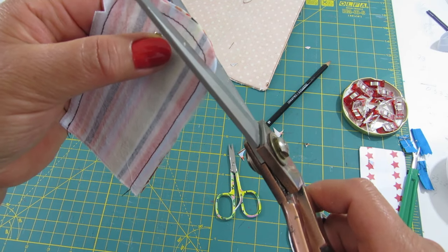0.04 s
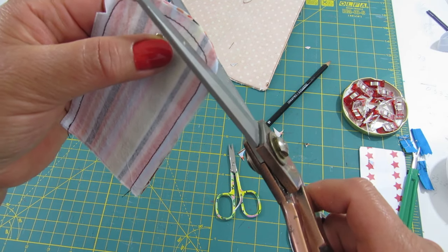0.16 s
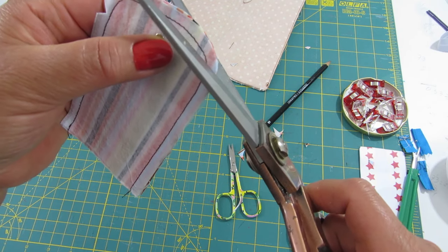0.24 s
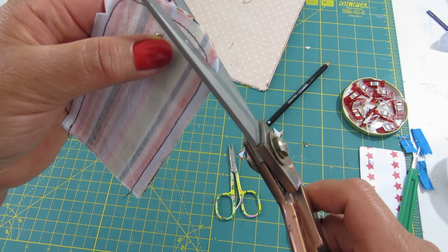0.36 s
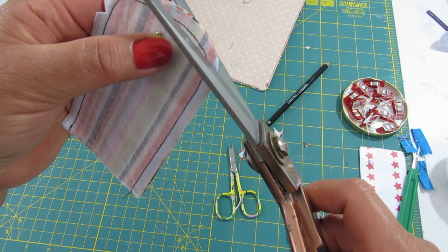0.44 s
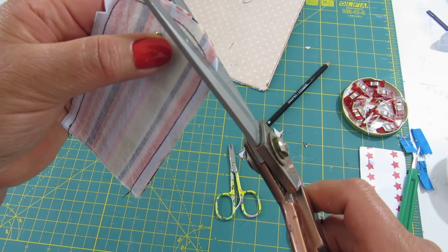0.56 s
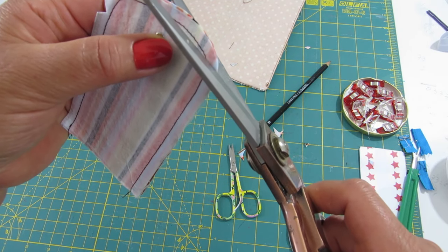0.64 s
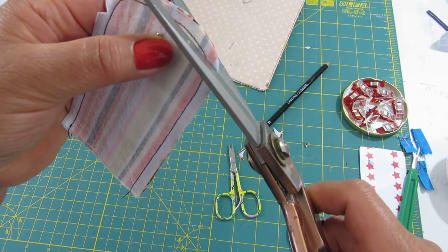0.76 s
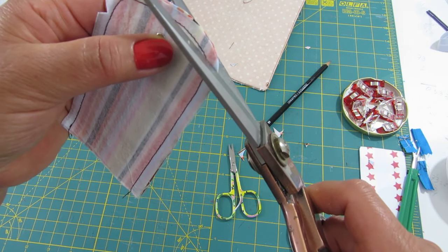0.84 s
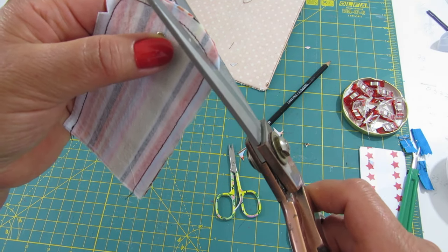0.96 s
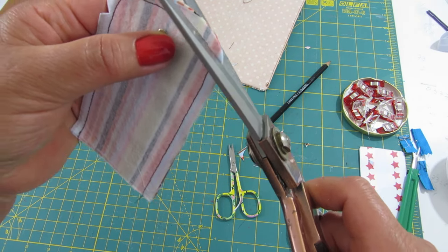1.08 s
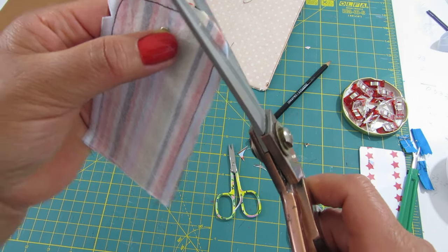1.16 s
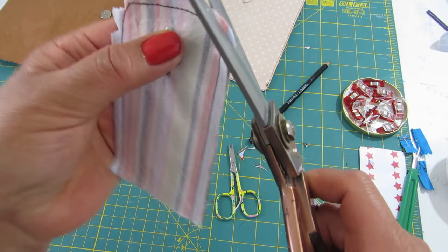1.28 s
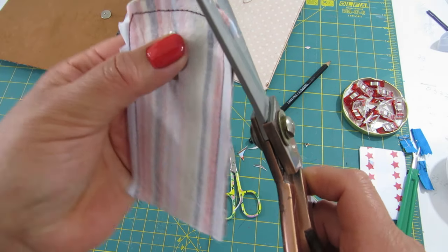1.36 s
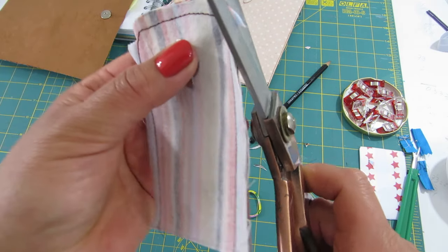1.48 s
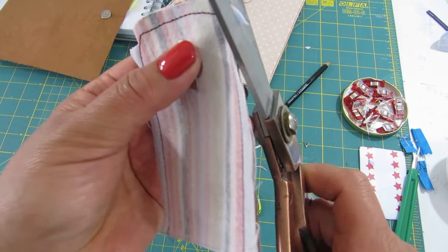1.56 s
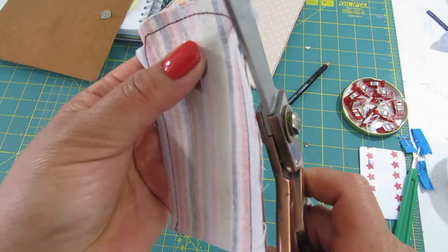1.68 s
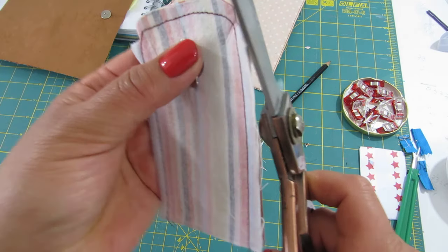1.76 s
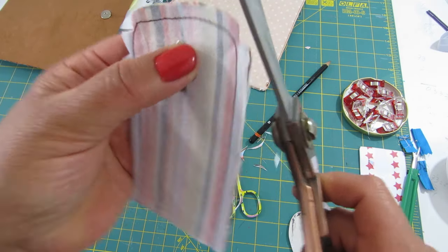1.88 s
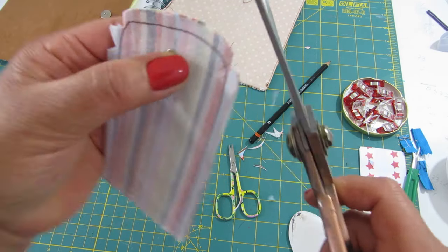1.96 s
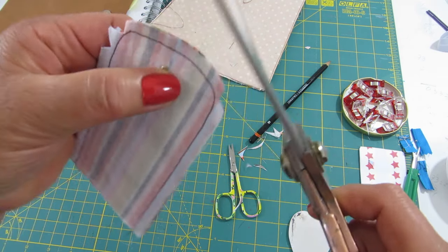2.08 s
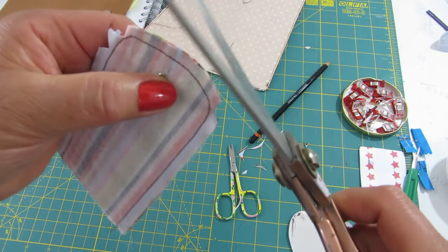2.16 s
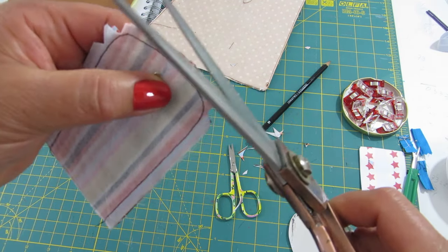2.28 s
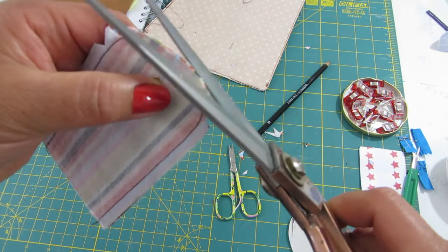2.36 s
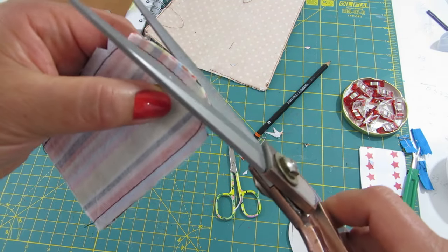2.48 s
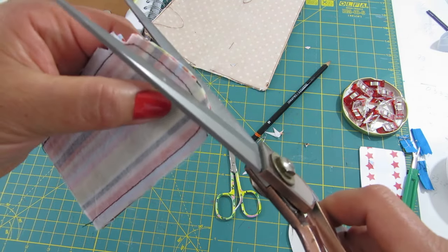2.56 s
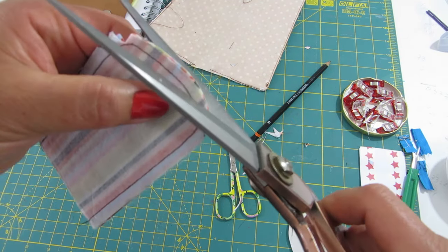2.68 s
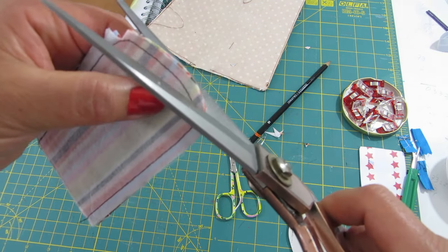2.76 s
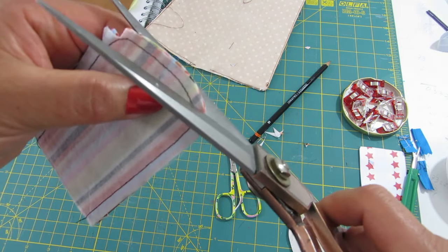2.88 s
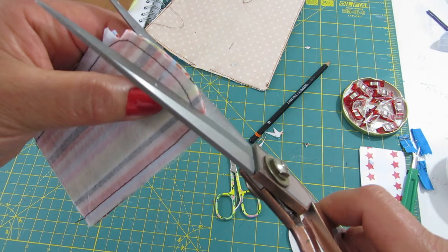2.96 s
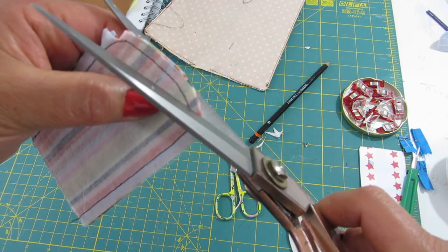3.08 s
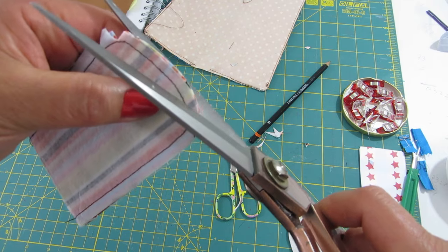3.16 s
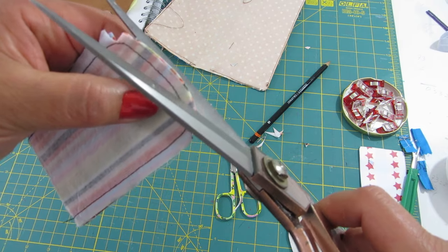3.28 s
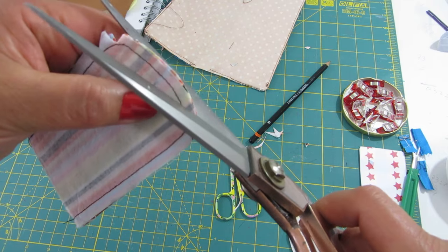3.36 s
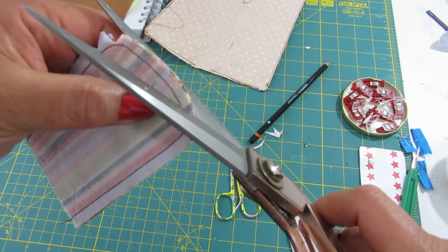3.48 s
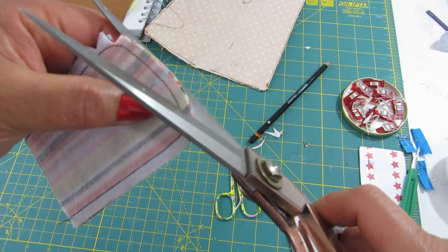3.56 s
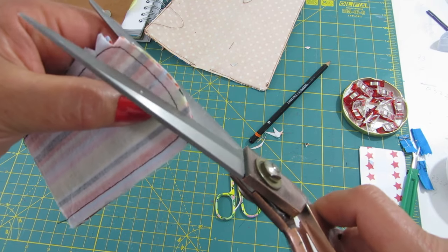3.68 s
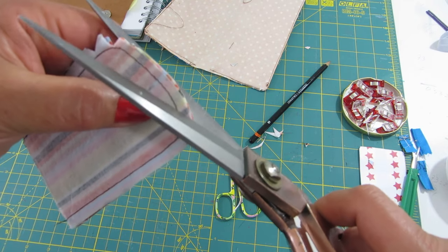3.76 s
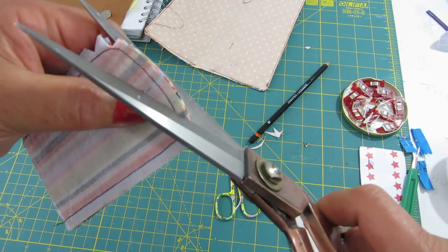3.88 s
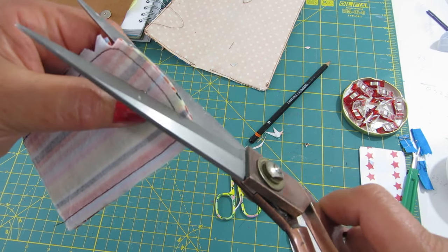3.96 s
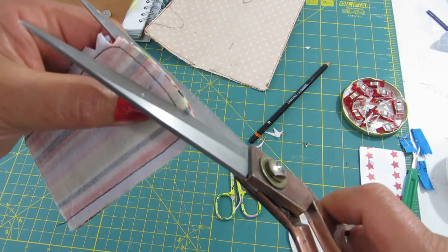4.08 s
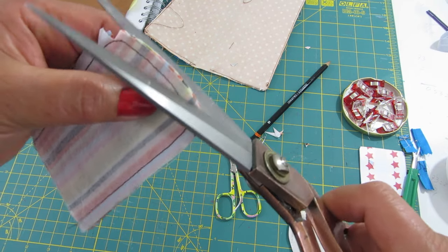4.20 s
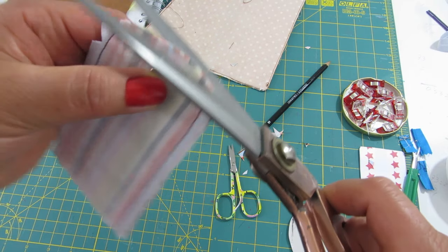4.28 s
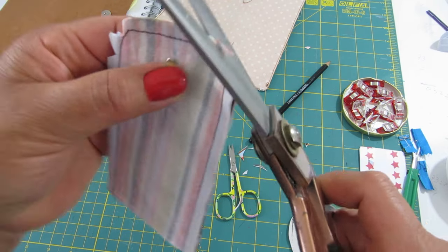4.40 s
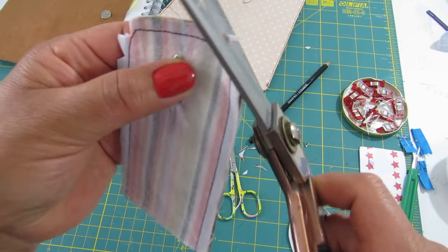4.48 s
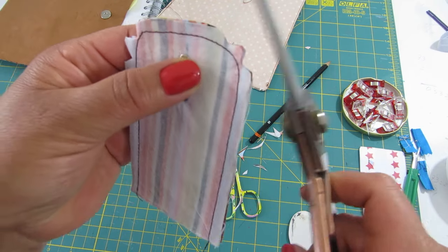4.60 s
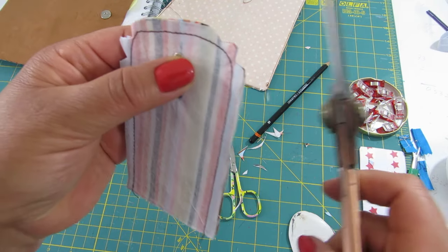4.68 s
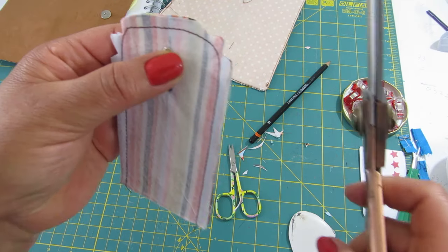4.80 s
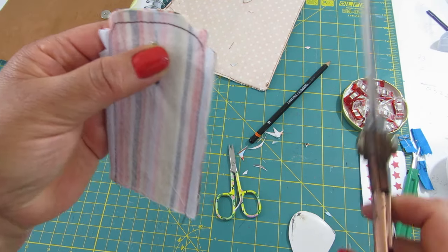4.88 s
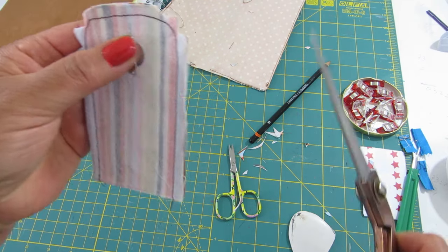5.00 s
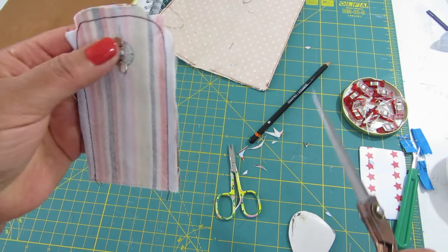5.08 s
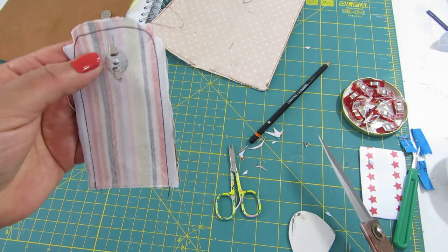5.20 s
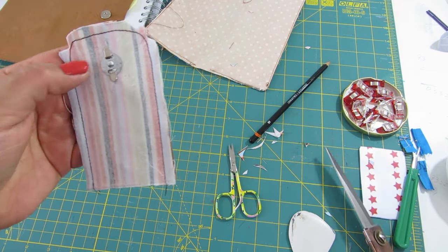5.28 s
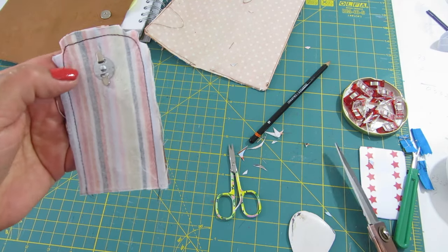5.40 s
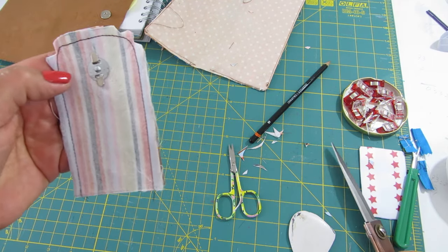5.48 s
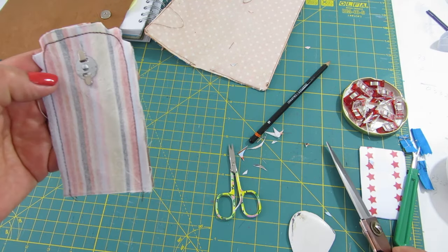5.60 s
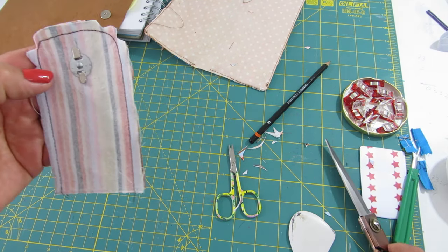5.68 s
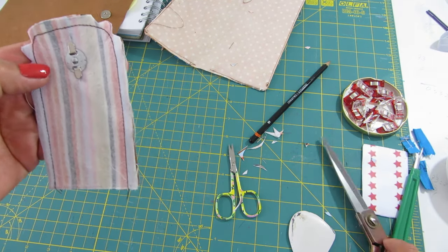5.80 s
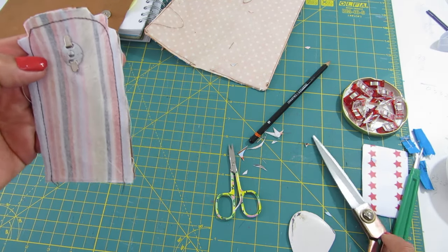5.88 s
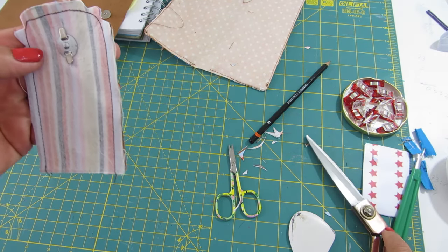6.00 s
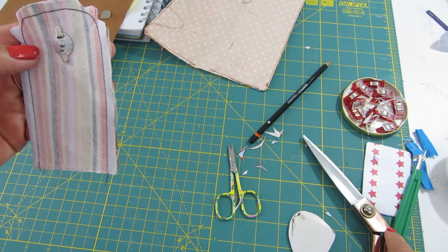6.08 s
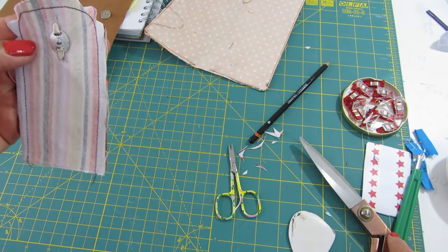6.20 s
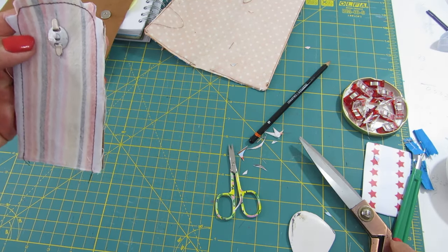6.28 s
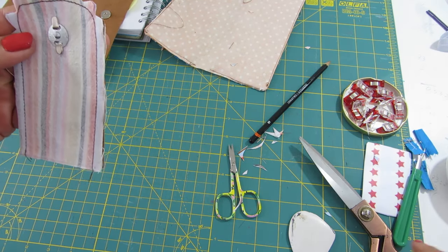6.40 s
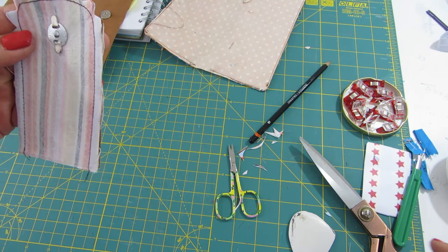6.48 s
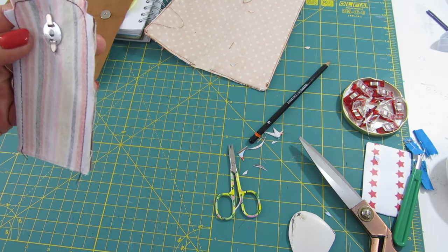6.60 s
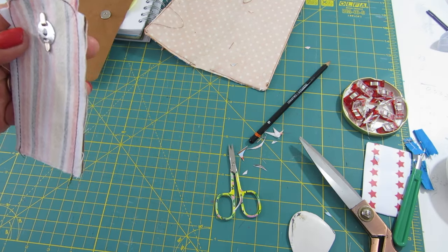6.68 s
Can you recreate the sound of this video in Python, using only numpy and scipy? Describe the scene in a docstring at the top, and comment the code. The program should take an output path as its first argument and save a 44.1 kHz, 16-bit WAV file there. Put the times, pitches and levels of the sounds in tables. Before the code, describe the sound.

Close scissor blades rasp in short pushes, cloth rustles and ticks, two quick crisp snips, then heavy shears knock down on the table.

```python
"""Large steel shears trim a cloth seam over a cutting mat, heard close in a small quiet room.
Over room air, fan and rumble the blades grind in short pushes: slips exciting gliding resonances.
Grains of noise make cloth rustle and a bite, short rings make ticks and taps; more grinding, two quick bites.
The shears touch the table, slide, drop: struck modes, rattle, low pulses, with a table shudder late on.
The recorder's gain control turns loud peaks down and recovers."""
import sys
import numpy as np
from scipy import signal
from scipy.fft import rfft, irfft, next_fast_len
from scipy.io import wavfile

SR = 44100
rng = np.random.default_rng(int(sys.argv[2]) if len(sys.argv) > 2 else 0)


def put_to_file(sound):
    """Save the sound as 16-bit audio at rate SR, in the file named by the first command-line argument."""
    columns = np.atleast_2d(sound).T  # one column per channel
    safe = np.clip(columns, -1, 1)
    whole_steps = np.round(safe * 32767)
    wavfile.write(sys.argv[1], SR, whole_steps.astype(np.int16))


N = 297366
T = np.arange(N) / SR   # seconds


def amp(db):
    """Decibels to gain."""
    return 10 ** (np.asarray(db) / 20)


def rms_one(x):
    """Scale to unit power."""
    return x / np.sqrt(np.mean(x ** 2) + 1e-20)


def shaped(x, spectrum):
    """Filter by a spectrum in dB, read between its points on a log frequency scale."""
    size = next_fast_len(N)
    hz, db = np.transpose(spectrum)
    f = np.maximum(np.arange(size // 2 + 1) * SR / size, 1)
    gain = amp(np.interp(np.log(f), np.log(hz), db, left=-80))
    return irfft(rfft(x, size) * gain, size)[..., :N]


def coloured(x, spectrum):
    """Give a sound a spectrum; rms 1."""
    return rms_one(shaped(x, spectrum))


def band(x, low_hz, high_hz):
    """Band-pass."""
    return signal.sosfilt(signal.butter(2, [low_hz, high_hz], "band", fs=SR, output="sos"), x)


def gliding(x, hz, width_hz):
    """A resonance whose centre may move: shift down, low-pass, shift back."""
    turn = np.exp(2j * np.pi * np.cumsum(hz) / SR)
    r = np.exp(-np.pi * width_hz / SR)
    return (signal.lfilter([np.sqrt(2 * (1 - r * r))], [1, -r], x / turn) * turn).real


def swell(start, end, rise, fall):
    """Gain 1 from start to end, 20 dB lower a rise time before and a fall time after."""
    before, after = (start - T) / rise, (T - end) / fall
    steps_down = np.maximum(np.maximum(before, after), 0)
    return amp(-20 * np.minimum(steps_down, 6))


def grains(per_s, spread_db):
    """Random slips of uneven size and sign."""
    sizes = amp(spread_db * np.minimum(rng.exponential(1, N), 5)) * rng.choice([-1, 1], N)
    return rms_one(sizes * (rng.random(N) < per_s / SR))


# Room air and recorder hiss, the part alike in both microphone ports.
# Each row: frequency in Hz, density in dB per Hz.
AIR_COLOUR = [(20, -4), (60, -16), (180, -16), (300, -10.5), (480, -14.5), (700, -5), (1200, -8),
              (1600, -11), (3000, -15.5), (10400, -23), (16000, -29)]
# The part opposed in the two ports. Each row: frequency in Hz, density in dB per Hz.
AIR_SIDE_COLOUR = [(15, -42.5), (25, -10), (102, -4), (394, -2.5), (887, 0), (962, -2.5), (1070, -0.5),
                   (6210, -16.5), (16000, -30.5)]
# A distant fan. Each row: resonance in Hz, width in Hz, level in dB before placing.
FAN = [(222.1, 10, -71.5), (441.4, 6.4, -73.5), (669, 5.7, -67.5), (1399, 24, -67.5)]
AIR_DB, AIR_SIDE_DB = -57, -46


def air():
    """Steady noise, mostly opposed in the two ports, with soft fan resonances near the middle."""
    mid = amp(AIR_DB) * coloured(rng.standard_normal(N), AIR_COLOUR)
    side = amp(AIR_SIDE_DB) * coloured(rng.standard_normal(N), AIR_SIDE_COLOUR)
    fan = np.zeros(N)
    for hz, width_hz, db in FAN:
        fan += amp(db) * gliding(rng.standard_normal(N), np.full(N, float(hz)), width_hz)
    return mid + fan * amp([[.5], [-.5]]) + side * np.array([[1], [-1]])


# A deep waver, mostly separate in the two channels and partly opposed.
# Each row: time in seconds, level in dB.
RUMBLE_LEVEL = [(0.0, -77), (0.41, -72), (4.35, -68), (4.52, -70.5), (5.95, -58), (6.74, -66.5)]


def rumble():
    """Narrow noise near the bottom of hearing, own in each channel plus an opposed part."""
    s, db = np.transpose(RUMBLE_LEVEL)
    centre_hz, width_hz = np.full(N, 46.0), 17.0
    left, right, opposed = (
        gliding(gliding(rng.standard_normal(N), centre_hz, width_hz), centre_hz, width_hz)
        for _ in range(3))
    pair = np.array([left + 0.7 * opposed, right - 0.64 * opposed])
    return amp(np.interp(T, s, db)) * rms_one(pair)


# Steady grinding of the blades. Each row: start in seconds, end in seconds, level of pressure in dB.
GRINDING = [(0.387, 0.48, -63), (0.586, 0.663, -63.5), (0.715, 0.787, -59), (3.814, 4.03, -54.5),
            (4.077, 4.135, -57.5)]
# Jerks as the edges catch and slip on.
# Each row: loudest moment in seconds, peak pressure in dB, rise in seconds, fall in seconds.
EDGE_JERKS = [(0.43, -50, .015, 0.018), (.454, -52, .003, .015), (0.475, -45, 0.017, 0.019),
              (0.601, -41, .01, 0.01), (0.656, -44.5, 0.02, 0.0096), (0.747, -43.5, 0.0033, 0.014),
              (0.818, -52.5, .015, .018), (3.848, -42, 0.012, 0.0073), (3.882, -42, .002, 0.021),
              (3.944, -41, 0.011, 0.013), (4.028, -46.5, .018, .012), (4.108, -43.5, .008, 0.015),
              (4.13, -46.5, .018, 0.013)]
# Blade resonances, moving as the crossing point moves out.
# Each row: a pair of start and end in seconds, then a list of resonances, each with
# Hz at the start, Hz at the end, width in Hz, relative dB at the start, relative dB at the end.
BLADE_MODES = [((0.379, 0.88), [(5840, 6000, 920, 5.5, -9), (6450, 6800, 710, 3.5, 6),
               (7200, 7500, 500, -8, -6), (8340, 8600, 430, 5, -1), (12200, 13200, 1400, -10, -13),
               (14600, 15300, 500, -6, -14)]), ((3.8, 4.16), [(5230, 5830, 430, 2, -6),
               (6700, 7160, 1100, -4, 2.5), (7850, 8000, 300, -5, -11), (8500, 9000, 330, -12, -5),
               (11700, 12500, 940, -18, -14), (12700, 13550, 510, -10, -11),
               (14700, 15000, 600, -20, -16)])]
PUSH_RISE_S, PUSH_FALL_S = 0.019, 0.047   # time to rise from and sink to 20 dB below


def blades():
    """Dense slips of edge on edge excite sliding blade resonances, each coming and going, with bare hiss."""
    pressure = np.zeros(N)
    for start, end, db in GRINDING:
        pressure += amp(db) * swell(start, end, PUSH_RISE_S, PUSH_FALL_S)
    for s, db, rise, fall in EDGE_JERKS:
        pressure += amp(db) * swell(s, s, rise, fall)
    force, out = pressure * grains(11000, spread_db=3.5), np.zeros(N)
    for (start, end), modes in BLADE_MODES:
        on = slice(int(start * SR), int((end + .05) * SR))
        steps = np.arange(start, end + .1, .012)
        for from_hz, to_hz, width_hz, from_db, to_db in modes:
            hz = np.interp(T[on], [start, end], [from_hz, to_hz])
            db = np.interp(T[on], [start, end], [from_db, to_db])
            wander_db = np.interp(T[on], steps, rng.normal(0, 3.0, len(steps)))
            patchy = amp(db + wander_db) * force[on]
            twice = gliding(gliding(patchy, hz, width_hz), hz, width_hz)   # steep skirts
            out[on] += amp(-3.5) * twice * np.sqrt(np.pi * width_hz / SR)
    return out + amp(-4.0) * band(force, 2200, 13300)


def pings(events, ring_s, rise_s, crack_db, lag):
    """Each touch crackles in a wide band about its pitch and rings briefly there, swelling in over rise_s."""
    out, t = np.zeros(N), T[:2000]
    for (s, db, hz), grit in zip(events, rng.standard_normal((len(events), 2000))):
        at = round((s + lag) * SR)
        ping = np.sin(2 * np.pi * hz * t) * amp(-60 * t / ring_s) * (1 - np.exp(-t / rise_s))
        burst = (t == 0) * 1.9 + grit * amp(-60 * t / 0.0053)
        crack = band(burst, 0.32 * hz, min(1.9 * hz, .45 * SR))
        crack = crack / np.abs(crack).max()
        out[at:at + 2000] += amp(db) * (ping + amp(crack_db) * crack)[:N - at]
    return out


# Small ticks of steel, thread and nail. Each row: time in seconds, nominal peak in dB, ring in Hz.
TICK_TOUCHES = [(1.1797, -38, 6460), (1.3818, -42, 5000), (1.3895, -29.5, 5560), (1.7025, -37, 6700),
                (1.7397, -21, 3520), (2.0378, -37.5, 3820), (2.0931, -40, 3150), (2.174, -41.5, 4830),
                (2.831, -36.5, 4500), (3.2002, -46, 2500), (4.2258, -38.5, 4960), (4.2528, -35, 7800),
                (4.2677, -33.5, 5170), (4.2887, -29.5, 5140), (4.334, -34, 6060), (4.8633, -41, 3920),
                (5.1245, -39, 7850), (5.3767, -35.5, 4100), (5.6007, -28, 4750), (5.8855, -39, 3130),
                (6.6897, -41, 3950)]


def ticks():
    """Hard touches: a sharp crackle with a very short ring."""
    return pings(TICK_TOUCHES, ring_s=0.0041, rise_s=.0001, crack_db=-2.0, lag=0.00088)


# Short pitched taps and squeaks. Each row: time in seconds, nominal peak in dB, ring in Hz.
TAP_TOUCHES = [(1.3898, -37, 1280), (4.2887, -34, 1080), (1.517, -34, 900), (1.723, -26, 750),
               (1.903, -41, 8900), (1.972, -44, 5800), (2.664, -47, 4660), (2.831, -38, 810),
               (4.574, -31.5, 320), (4.625, -31, 178), (6.105, -31.5, 1225), (6.719, -36.5, 1400)]


def taps():
    """Softer touches: a longer ring that swells in, almost without crackle."""
    return pings(TAP_TOUCHES, ring_s=0.011, rise_s=0.00063, crack_db=-40, lag=0.00026)


def crunch(bright, low, colour, body, per_s, spread_db, snap_db):
    """Fibres slipping: bright grains, sparser snaps and a duller body under them."""
    slips = grains(per_s, spread_db) + amp(snap_db) * grains(300, spread_db=1.5)
    return bright * coloured(slips, colour) + low * coloured(slips, body)


# Cloth, fingers and shears sliding. Each row: loudest moment in seconds, rise in seconds,
# fall in seconds, bright level in dB, low body level in dB, both before the lumps.
SLIDES = [(1.397, 0.033, 0.055, -51, -64), (1.48, 0.028, 0.11, -51.5, -70), (1.82, 0.025, 0.13, -57, -63),
          (1.899, 0.044, 0.25, -61, -76), (2.826, 0.045, 0.055, -54.5, -57), (3.2, 0.1, 0.13, -61, -63),
          (3.44, 0.17, 0.087, -58, -64.5), (4.29, 0.057, 0.24, -53, -66.5),
          (4.62, 0.072, 0.11, -58.5, -52.5), (4.97, 0.25, 0.18, -58.5, -62), (5.17, 0.19, 0.62, -60, -71),
          (5.445, 0.096, 0.11, -50, -52), (5.89, 0.016, 0.051, -55.5, -52), (5.98, 0.17, 0.4, -55, -53.5),
          (6.72, 0.21, .1, -58.5, -60)]
# Bright part of the rustle. Each row: frequency in Hz, density in dB per Hz.
SLIDE_COLOUR = [(600, -12), (1500, -2), (2500, 2), (5000, 3), (8000, -2.5), (12000, -10.5), (16000, -14)]
# Low body of the rustle. Each row: frequency in Hz, density in dB per Hz.
SLIDE_BODY = [(60, -13), (110, 3), (900, 0.5), (1800, -2.5), (4000, -46.5)]


def rustle():
    """Fibre slips swell to a loudest moment and die away, lumpy because cloth gives way in fits."""
    lumps = amp(np.interp(T, np.arange(700) * .012, rng.normal(0, 3.0, 700)))
    bright, low = np.zeros(N), np.zeros(N)
    for s, rise, fall, bright_db, low_db in SLIDES:
        gain = swell(s, s, rise, fall)
        bright += amp(bright_db) * gain
        low += amp(low_db) * gain
    return crunch(lumps * bright, lumps * low, SLIDE_COLOUR, SLIDE_BODY,
                  9000, spread_db=2.5, snap_db=-9)


# Blades biting through the seam. Each row: first contact in seconds, full bite in seconds,
# edges stop in seconds, level in dB, level of the duller crunch in dB.
SEAM_BITES = [(1.7186, 1.7234, 1.743, -36, -41.5), (4.528, 4.547, 4.5605, -33, -55),
              (4.569, 4.574, 4.584, -30, -39)]
# Bright part of the bite. Each row: frequency in Hz, density in dB per Hz.
SEAM_COLOUR = [(900, -66), (1500, -12), (3300, -11), (4100, -11), (4900, -4), (5700, -12.5), (6500, 2),
               (7400, -9), (9100, -1.5), (10600, -20), (12000, -9), (16000, -15)]
# Body of the bite. Each row: frequency in Hz, density in dB per Hz.
SEAM_BODY = [(150, -23), (300, -8.5), (900, 11.5), (1800, -8), (4000, -22)]
BITE_BODY_DB = -15.5
CATCH_S, CATCH_FADE_S = 0.008, 0.0027   # the quicker the bite, the harder its first catch
BITE_SAG_DB_S = 107   # the hold weakens as the blades close
BITE_STOP_S, AFTER_DB, AFTER_S = 0.00063, -17.5, 0.064   # then loose threads whisper on


def biting(column):
    """Gain of the bites: build up, catch, hold while sagging, stop dead, whisper on."""
    gain = np.zeros(N)
    for row in SEAM_BITES:
        touch, full, stop = row[:3]
        sag = amp(-BITE_SAG_DB_S * np.clip(T - full, 0, stop - full))
        hold = swell(full, stop, (full - touch) / 1.35, BITE_STOP_S) * sag
        whisper = amp(AFTER_DB) * swell(stop, stop, BITE_STOP_S, AFTER_S)
        catch = CATCH_S / (full - touch) * swell(full, full, CATCH_FADE_S, 2 * CATCH_FADE_S)
        gain += amp(row[column]) * (hold + whisper + catch)
    return gain


def bites():
    """Severed fibres: a bright crunch with a body, and a duller mid-band crunch of its own level."""
    gain = biting(column=3)
    bright = crunch(gain, amp(BITE_BODY_DB) * gain, SEAM_COLOUR, SEAM_BODY,
                    14000, spread_db=2.0, snap_db=-34)
    dull = rms_one(band(grains(14000, spread_db=5.0), 1900, 4400))
    return bright + biting(column=4) * dull


def ring(clicks, hz, t60):
    """A unit click sets a sine of height 1 ringing."""
    r, w = amp(-60 / (t60 * SR)), 2 * np.pi * hz / SR
    return signal.lfilter([0, np.sin(w)], [1, -2 * r * np.cos(w), r * r], clicks + 1e-18)


# Contacts with the table. Each row: time in seconds, thud in the table in dB,
# clatter of the shears in dB, low push in dB; all levels are relative drives.
CONTACTS = [(5.378, -51, -53, -36), (5.6018, -30.5, -52.5, -51), (5.6049, -35.5, -55, -53),
            (5.6098, -27.5, -52, -45), (5.952, -61, -54.5, -43), (6.2557, -20, -12, -43),
            (6.2641, -16.5, -15.5, -35), (6.266, -51.5, -18, -42.5), (6.2711, -38, -22, -45)]


def struck(modes, column, sign):
    """Each contact strikes each mode with its own strength; a negative sign alternates their direction."""
    rows = np.array(CONTACTS)
    at, out = np.round(rows[:, 0] * SR).astype(int), np.zeros(N)
    chance_db = rng.normal(0, 1.5, (len(rows), len(modes)))
    for k, (hz, db, t60) in enumerate(modes):
        clicks = np.zeros(N)
        clicks[at] = amp(rows[:, column] + db + chance_db[:, k])
        out += ring(clicks, hz, t60) * sign ** k
    return out


# Modes of the table. Each row: frequency in Hz, relative level in dB, time to fall 60 dB in seconds.
TABLE_MODES = [(135, -15.5, 0.49), (234, -14, 0.04), (341, 5.5, 0.028), (447, 4, 0.023), (550, 4, 0.032),
               (680, 0, 0.052), (810, -7, 0.027), (1000, -10, 0.036)]
CONTACT_HZ = 1300   # the mat softens each contact


def thud():
    """The table's modes ring together after each contact, their treble softened."""
    return band(struck(TABLE_MODES, column=1, sign=0.99), 185, CONTACT_HZ)


PUSH_LOW_HZ, PUSH_HIGH_HZ = 90, 298   # the table top gives way under each contact


def thump():
    """Each contact pushes the table top: one dull low pulse."""
    clicks = np.zeros(N)
    for s, _, _, db in CONTACTS:
        clicks[round(s * SR)] = amp(db) * SR / PUSH_HIGH_HZ / 2
    once = band(clicks + 1e-18, PUSH_LOW_HZ, PUSH_HIGH_HZ)
    return band(once, PUSH_LOW_HZ, PUSH_HIGH_HZ)


# Modes of the shears. Each row: frequency in Hz, relative level in dB, time to fall 60 dB in seconds.
SHEARS_MODES = [(842, -11, 0.063), (940, 1, 0.056), (1096, -7, 0.066), (1497, 1, 0.053), (1737, -3, 0.049),
                (1898, 0, 0.053), (2090, 1, 0.028), (2304, 2, 0.05), (2570, 1.5, 0.024), (2782, -2, 0.03),
                (3120, 4.5, 0.012)]


def clatter():
    """The shears' modes ring after each contact, neighbours starting in opposite directions."""
    return band(struck(SHEARS_MODES, column=2, sign=-0.99), 300, 4500)


def chatter():
    """Loose blades rattle for a few milliseconds after each contact: a bright dying hiss."""
    clicks = np.zeros(N)
    for s, _, db, _ in CONTACTS:
        clicks[round(s * SR)] = amp(db)
    fade = signal.lfilter([1], [1, -amp(-60 / (0.036 * SR))], clicks + 1e-18)
    colour = [(500, 7.0), (1200, 12.0), (3200, 5.5), (5000, -9.5), (9000, -15.5), (16000, -17.5)]
    return amp(8) * fade * coloured(rng.standard_normal(N), colour)


# A low shudder as a hand leaves the table. Each row: time in seconds, pitch in Hz, level in dB.
SHUDDER_PATH = [(6.5, 217, -70.5), (6.554, 208, -48.5), (6.65, 202, -62)]


def shudder():
    """A narrow, lumpy wobble of the table top: noise through a gliding resonance."""
    s, hz, db = np.transpose(SHUDDER_PATH)
    gain = amp(np.interp(T, s, db, left=-120, right=-120))
    return gain * gliding(rng.standard_normal(N), np.interp(T, s, hz), 15)


# Reverberation of the small room. Each row: lower band edge in Hz, time to fall 60 dB in seconds
# from there up to the next edge; the last row only closes the top band.
ROOM_DECAY = [(170, 0.23), (500, 0.26), (1500, 0.26), (3000, 0.2), (8000, .15), (16000, .12)]
ROOM_DB, KNOCK_ROOM_DB, ROOM_LIKENESS = -8.5, -6.5, 0.83   # likeness of the two channels


def room(x):
    """A dense tail of reflections that builds up within a few milliseconds and dies faster in the treble."""
    t, tail = T[:SR // 2], 0
    for (low_hz, t60), (high_hz, _) in zip(ROOM_DECAY, ROOM_DECAY[1:]):
        noise = band(rng.standard_normal((2, len(t))), low_hz, high_hz)
        tail = tail + noise * amp(-60 * t / t60)
    tail = tail * (1 - np.exp(-t / 0.00075))
    shared = np.sqrt(1 + ROOM_LIKENESS) * tail[0]
    opposed = np.sqrt(1 - ROOM_LIKENESS) * tail[1] * np.array([[1], [-1]])
    tail = rms_one(shared + opposed) / np.sqrt(len(t))
    return signal.fftconvolve(x[None], tail, axes=1)[:, :N]


def placed(x, pan_db, left_lag):
    """Louder on the left by pan_db, arriving there later by a fraction of a sample."""
    size = next_fast_len(N)
    bins = np.arange(size // 2 + 1)
    turn = np.exp(-1j * np.pi * bins / size * left_lag * np.array([[1], [-1]]))
    return irfft(rfft(x, size) * turn, size)[:, :N] * amp([[pan_db / 2], [-pan_db / 2]])


def scene():
    """Hands and shears near the middle, the table louder on the left, all in the room."""
    hands = blades() + ticks() + taps() + rustle() + bites()
    shears = chatter() - clatter()
    table = thud() + thump() + shudder()
    near = placed(hands, -0.18, left_lag=0.36)
    near = near + placed(shears, 0.48, left_lag=0.8)
    near = near + placed(table, 5.6, left_lag=.1)
    near = band(near, 95, 16000)   # the microphone's low cut thins the deep bass of the near sounds
    echoes = room(amp(ROOM_DB) * hands + amp(KNOCK_ROOM_DB) * (shears + table))
    return near + echoes + air() + rumble()


DUCK_FROM_DB, DUCK_SHARE, RECOVER_DB_S = -12.5, 0.36, 12.5   # share of the excess taken off
CUTOFF_HZ = 15900


def record(dry):
    """Gain control ducks on loud peaks and recovers steadily; the top is cut."""
    peak_db = 20 * np.log10(np.abs(dry).max(axis=0) + 1e-9)
    over_db = np.maximum(peak_db - DUCK_FROM_DB, 0) * DUCK_SHARE
    held_db = np.maximum.accumulate(over_db + RECOVER_DB_S * T) - RECOVER_DB_S * T
    r = np.exp(-1 / (0.0032 * SR))   # the gain follows with a 3.2 ms time constant
    ducked = dry * amp(-signal.lfilter([1 - r], [1, -r], held_db))
    rounded = .96 * np.tanh(ducked / .96)   # the highest peaks are squeezed
    return signal.sosfilt(signal.ellip(12, .5, 80, CUTOFF_HZ, fs=SR, output="sos"), rounded)


dry = scene()
out = record(dry)
put_to_file(out)
```